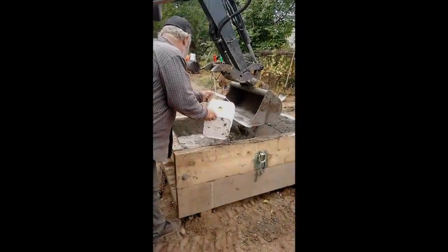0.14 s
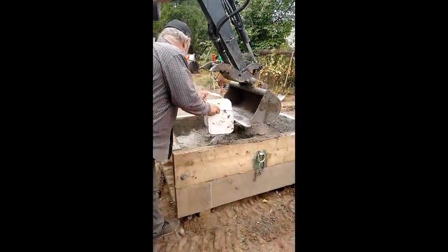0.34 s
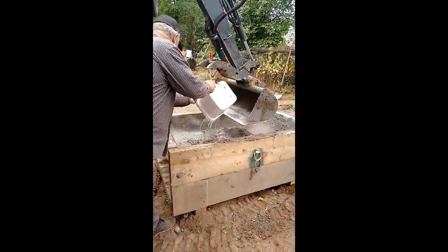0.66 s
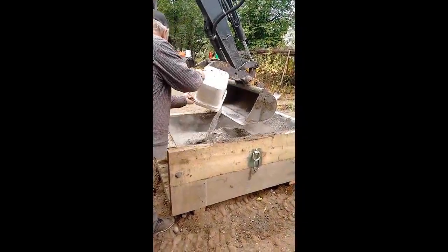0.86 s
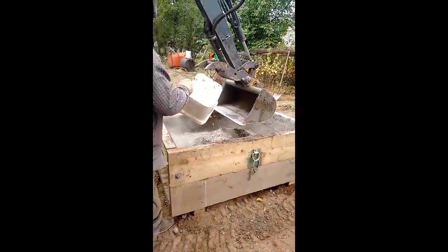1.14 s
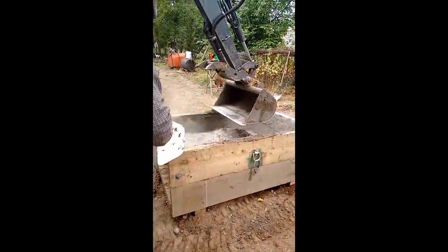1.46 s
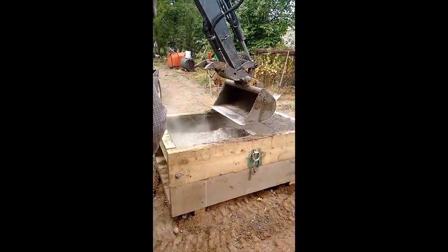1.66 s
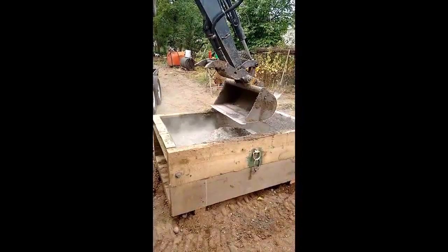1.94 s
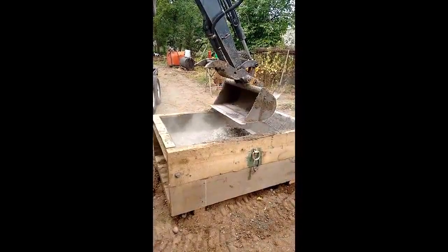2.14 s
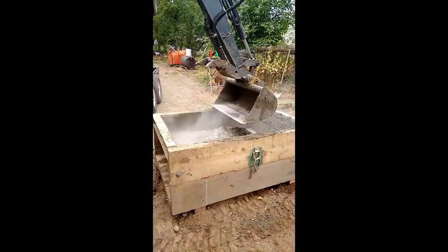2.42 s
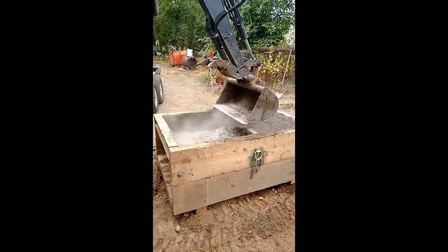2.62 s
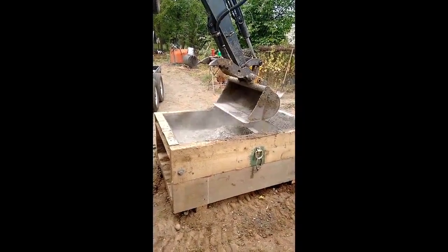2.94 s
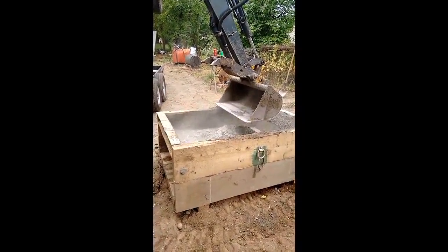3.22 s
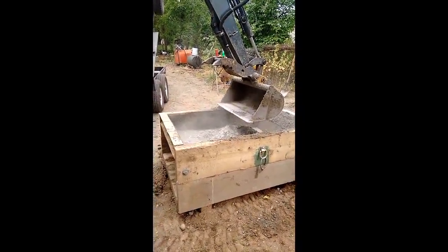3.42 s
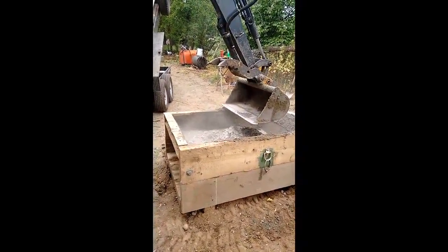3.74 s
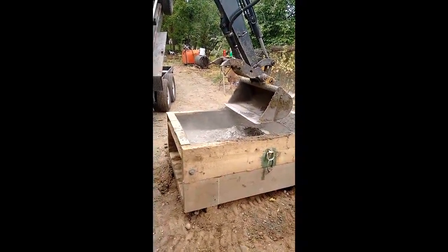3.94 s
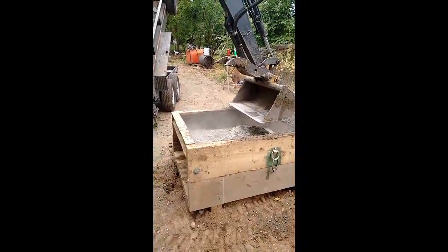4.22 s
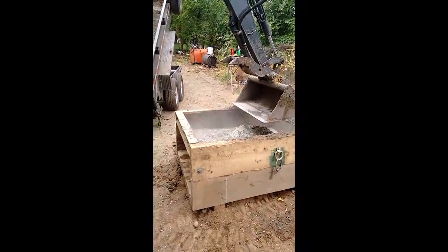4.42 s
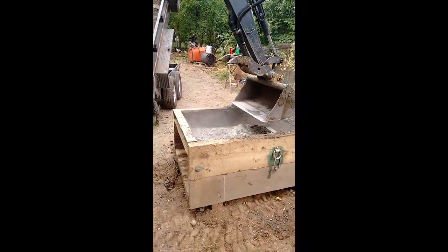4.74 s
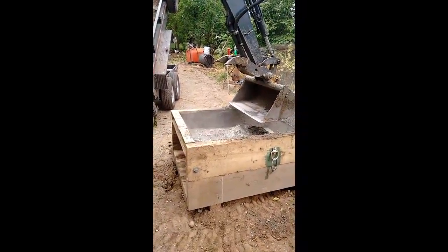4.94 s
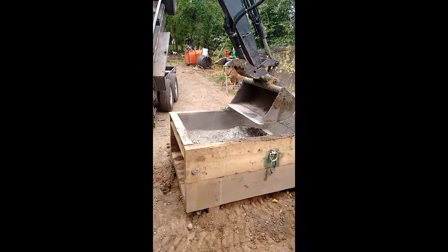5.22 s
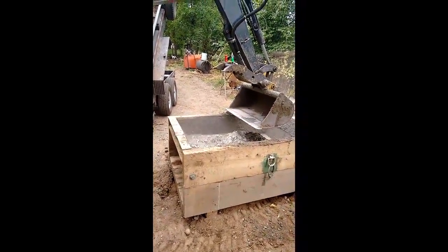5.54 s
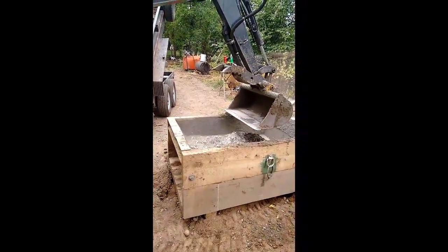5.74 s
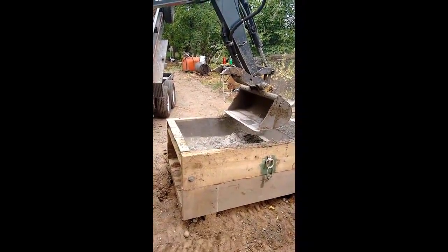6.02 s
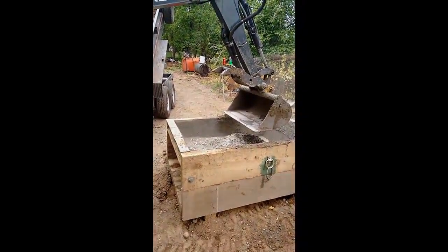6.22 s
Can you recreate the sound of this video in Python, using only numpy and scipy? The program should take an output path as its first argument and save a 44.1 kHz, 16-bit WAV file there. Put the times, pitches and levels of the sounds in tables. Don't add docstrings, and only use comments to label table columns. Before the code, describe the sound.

Steady diesel clatter in a yard, a short pour of water with slaps and bubbles, gritty footsteps, then a loud plastic tub landing on stones.

```python
import sys
import numpy as np
from scipy import signal
from scipy.fft import rfft, irfft, next_fast_len
from scipy.io import wavfile
from scipy.ndimage import uniform_filter1d, map_coordinates

SR = 44100
rng = np.random.default_rng(int(sys.argv[2]) if len(sys.argv) > 2 else 0)


def store_wav(level_fs):
    pcm = np.round(np.clip(np.atleast_2d(level_fs), -1, 1) * 32767)
    wavfile.write(sys.argv[1], SR, pcm.T.astype(np.int16))


def voltage_ratio(level):
    return 10 ** (np.asarray(level, float) / 20)


N = 280917

# order (multiple of cycle rate), level_db (rms)
SHAFT_ORDERS = [(3, -36), (6, -44.5), (9, -54.5), (10, -50), (11, -53), (12, -39.5), (15, -38.5), (16, -56),
                (18, -44), (19, -57), (20, -43.5), (21, -48), (23, -46), (24, -41), (25, -43), (26, -45),
                (27, -40), (28, -37), (29, -48), (30, -49), (32, -43), (33, -46), (34, -44), (36, -44),
                (39, -50), (42, -51), (43, -53), (45, -47), (48, -54), (54, -55), (57, -50.5), (60, -49.5),
                (70, -51), (71, -49), (72, -55), (73, -48)]
# place_cycles (0-1), knock_db, tick_db
INJECTIONS = [
    (.078, 15.5, 7),
    (.385, 11, -4),
    (.728, 15.5, 11),
]
# time_s, lead_cycles
GOVERNOR_LEAD = [(0, -.004), (.7, -.003), (1.3, .004), (1.9, .005), (2.7, 0), (3.4, -.003), (5.4, -.006),
                 (6.2, -.001)]
# time_s, load_db
EXHAUST_LOAD = [(0, 0.5), (.5, 0.5), (1.7, 2), (2.0, -2), (3.0, -3), (3.6, -2), (4.3, -0.5), (6.3, 0)]
# freq_hz, density_db_per_hz
ROAR_SPECTRUM = [(45, -7), (60, -16), (80, -12), (100, -7), (120, 1.5), (135, -6.5), (170, -6.5),
                 (215, -10), (255, -5.5), (290, -1.5), (340, -3), (400, -4), (470, -8.5), (540, -18),
                 (620, -19), (800, -20.5)]
# freq_hz, density_db_per_hz
FAN_SPECTRUM = [(350, -0.5), (480, 5.5), (540, -0.5), (620, -5.5), (740, -7), (800, -0.5), (860, -5.5),
                (1300, -11.5), (1900, -19), (2300, -14.5), (3500, -25), (4700, -28), (5800, -29.5),
                (7200, -34.5), (9000, -30.5), (13000, -40.5), (16000, -49)]
# freq_hz, density_db_per_hz
KNOCK_SPECTRUM = [(900, -3), (1800, 7.5), (2500, 14), (3100, 8.5), (3700, 1.5), (4300, -15), (5500, -44)]
# freq_hz, density_db_per_hz
TICK_SPECTRUM = [(4000, -26), (5300, 0), (6200, -2), (7500, -20)]
# freq_hz, density_db_per_hz
CASING_SPECTRUM = [(450, -18), (600, -5), (800, -4), (1100, -6.5), (1500, -10.5), (2000, -20)]
# time_s, flow_db
STREAM_FLOW = [(0.0, -48.5), (0.14, -44.5), (0.24, -34.5), (0.4, -37), (0.5, -36.5), (0.62, -34),
               (0.9, -40), (1.05, -38), (1.2, -38), (1.34, -42.5)]
# freq_hz, density_db_per_hz
SPLASH_SPECTRUM = [(1000, 13.5), (2500, 7.5), (4000, 2.5), (6000, 3), (7500, -1), (9000, 1.5),
                   (11500, -4.5), (13500, -10), (16000, -20)]
# start_s, peak_db, pitch_hz
SLAPS = [(0.254, -15, 840), (0.386, -13.5, 770), (0.786, -20, 830), (1.14, -18, 740), (2.56, -24, 1030),
         (2.598, -26, 856), (2.651, -21, 665), (2.9435, -15.5, 680), (2.999, -20.5, 700), (1.5, -19, 600),
         (0.413, -21, 1080), (1.034, -24, 611), (1.159, -31, 634), (1.338, -25, 786), (2.612, -25, 330),
         (0.621, -34, 517), (4.79, -22, 1140), (4.976, -21, 1500), (5.368, -19, 1010), (4.588, -19, 330),
         (4.605, -31, 400), (5.682, -20, 1090)]
# start_s, crack_db, body_db, crack_t60_s
TUB_CONTACTS = [(4.305, -10.5, -6.5, 0.042), (4.3313, -20.5, -28, 0.067), (4.346, -32, -32, 0.033),
                (4.369, -25.5, -29, 0.05), (4.504, -37, -63, 0.056), (4.523, -41, -50, 0.06),
                (4.53, -26, -42, 0.032), (4.5383, -30, -52, 0.043), (4.6024, -27.5, -35, 0.05),
                (4.619, -25.5, -40, 0.022), (4.643, -39.5, -44, 0.11)]
# freq_hz, level_db, t60_s
SHELL_MODES = [(159, -14.5, 0.22), (318.4, -8, 0.14), (400, -21, 0.12), (542, 1, 0.17), (600, 3, 0.085),
               (720, -1, 0.051), (844, 8, 0.039), (1040, -22, 0.018), (1350, -2, 0.04), (1730, -10, 0.03)]
# peak_s, level_db, dies_s, grit_db, boom_db
TUB_SKIDS = [
    (4.312, -24, 0.2, -5, 3.5),
    (4.536, -33.5, 0.13, -4, -14),
    (4.622, -35, 0.2, -6, -6),
    (4.633, -42, 0.26, -3, 9),
]
# freq_hz, density_db_per_hz
RIM_SPECTRUM = [(700, -8), (1000, -1), (1140, 1.5), (1280, -10), (1400, -5), (1600, -11), (2100, -25)]
# peak_s, level_db, dies_s, grit_db, boom_db
BOOT_STROKES = [
    (2.605, -28, 0.056, -8, 3.5),
    (2.652, -27, 0.11, -30, 0),
    (2.985, -35.5, 0.22, -14, 2),
    (4.045, -35.5, 0.13, -3, -14),
]
# start_s, peak_db, dull_db
GRIT_SNAPS = [(0.021, -35.5, -34), (0.1547, -30, -47), (0.1916, -40, -48), (0.235, -31, -32),
              (0.256, -34, -27.5), (0.3952, -26, -34), (0.413, -29, -36), (0.5593, -25, -41),
              (0.919, -45, -36), (1.0646, -38, -49), (1.1205, -29.5, -35), (0.8585, -30, -35),
              (0.983, -28, -35), (1.027, -26, -47), (1.036, -41, -46), (1.277, -33, -32),
              (2.3105, -35, -57), (2.318, -39, -58), (2.3557, -38, -56), (2.399, -35, -51),
              (2.436, -34, -38), (2.4744, -42, -46), (2.5626, -37, -52), (2.6055, -41, -56),
              (3.0494, -40, -55), (3.3294, -37, -51), (3.3594, -43, -57), (3.245, -40, -56),
              (4.744, -50, -48.5), (4.766, -46, -42), (4.822, -41, -54), (4.906, -41.5, -51),
              (4.978, -58, -45), (5.1183, -47, -55), (5.3094, -44, -55), (4.058, -39, -42)]
# start_s, peak_db
GRIT_TINKS = [
    (2.3984, -45),
    (2.4744, -46),
    (4.7664, -52),
    (4.821, -41),
    (4.906, -54),
]
# start_s, level_db, t60_s
WIND_PUFFS = [
    (1.7, -34, .25),
    (5.45, -36, .2),
    (5.86, -26, .2),
]
# freq_hz, left_lead_rad
PORT_LEAD = [(1100, 0), (2350, -np.pi), (14700, -11 * np.pi)]
# freq_hz, left_minus_right_db
PORT_TILT = [(40, 1), (130, -1.5), (500, -4), (700, -1.5), (1300, 0.5), (2200, -4.5), (3500, -1),
             (5500, -6), (8500, -2.5), (9600, -3.5), (11500, -13.5), (15000, -25.5)]
# freq_hz, likeness (0-1)
PORT_LIKENESS = [(40, .85), (70, .35), (130, .72), (400, .88), (650, .68), (1200, .98), (2300, .88),
                 (6000, .75), (8500, .15), (15000, .05)]
# from_hz, to_hz, rarity, rarity_change_per_s
CENTRE_HOLES = [(2150, 2450, 2.6, -.2), (4400, 4750, .3, .25), (4750, 5100, -.2, .33),
                (7050, 7450, 1.5, -.05)]
# from_hz, to_hz, rarity
SIDE_HOLES_BANDS = [(3450, 3800, .7), (5850, 6150, 1.3), (7200, 7500, 1.9), (8300, 8700, 1.1)]

CYCLE_HZ = 11.137
CHUG_FIRST_ORDER, CHUG_LAST_ORDER = 23, 36
STREAM_STOPS_S, DROP_S = 1.35, 4.306


def unit(x):
    return x / np.sqrt(np.mean(x ** 2) + 1e-20)


def along(points, hz):
    f, v = np.transpose(points)
    return np.interp(np.log(hz + 1), np.log(f + 1), v)


def closed(spectrum):
    return [(spectrum[0][0] / 2, -90), *spectrum, (spectrum[-1][0] * 2, -90)]


def curve(rows):
    s, v = np.transpose(rows)
    return np.interp(np.arange(N) / SR, s, v)


def wobble(knots_per_s):
    knots = rng.standard_normal(int(N * knots_per_s / SR) + 4)
    return map_coordinates(knots, [np.arange(N) * knots_per_s / SR])


def filtered(x, response):
    m = next_fast_len(N + 8192)
    return irfft(rfft(x, m) * response(np.fft.rfftfreq(m, 1 / SR)), m)[..., :N]


def noise(spectrum, grain_db=0, rate=300):
    shape = closed(spectrum)
    grain = voltage_ratio(grain_db * wobble(rate))
    return unit(filtered(grain * rng.standard_normal((3, N)), lambda hz: voltage_ratio(along(shape, hz))))


def bursts(rows, rise_s):
    out, t = np.zeros(N + SR), np.arange(SR // 4) / SR
    for start_s, db, t60_s in rows:
        out[round(start_s * SR):][:len(t)] += voltage_ratio(db - 60 * t / t60_s) * np.clip(t / rise_s, 0, 1)
    return out[:N]


def engine():
    t, tone = np.arange(N) / SR, np.zeros(N)
    cycle = CYCLE_HZ * t + .853 + curve(GOVERNOR_LEAD)
    load_db = curve(EXHAUST_LOAD)
    pump_order, pump_beat = 15, .3 * np.cos(2 * np.pi * 2.27 * (t - .3))
    low_place, high_place, whine_order = .105, .02, 65

    for k, db in SHAFT_ORDERS:
        unsteady = np.clip(1 + (k / 36) ** 3, 0, 8)
        phase = 2 * np.pi * (k * (cycle - .23) - .044 * (k - 26.4) ** 2) + .1 * rng.standard_normal()
        low_firing = k % 3 == 0 and 10 < k < CHUG_FIRST_ORDER
        if low_firing or k > whine_order:
            place = low_place if k < CHUG_FIRST_ORDER else high_place
            phase = 2 * np.pi * k * (cycle - place) + np.pi / 2
        phase += 0.06 * unsteady * wobble(4.6)
        chug_db = load_db * (CHUG_FIRST_ORDER <= k <= CHUG_LAST_ORDER)
        level = voltage_ratio(db + 3.5 + chug_db + 0.41 * unsteady * wobble(7))
        tone += level * np.cos(phase) * (1 + (k == pump_order) * pump_beat)

    throb_db = 1.8 * np.cos(2 * np.pi * (cycle - .2))
    fan_db = .2 * wobble(2.6) + .8 * wobble(37)
    roar = voltage_ratio(-33.0 + throb_db + 0.11 * wobble(4.1)) * noise(ROAR_SPECTRUM)
    fan = voltage_ratio(-33.0 + 0.014 * throb_db + fan_db) * noise(FAN_SPECTRUM)

    knock, tick = np.zeros(N), np.zeros(N)
    for place, knock_db, tick_db in INJECTIONS:
        since = (cycle - place) % 1
        size_db = rng.normal(0, 1., 100)[(cycle - place + 1).astype(int)]
        knock += voltage_ratio(knock_db + size_db - 60 * since / .42) * np.clip(since / .025, 0, 1)
        tick += voltage_ratio(tick_db + size_db - 60 * since / .4) * np.clip(since / .02, 0, 1)
    clatter = voltage_ratio(-48.5) * knock * noise(KNOCK_SPECTRUM, grain_db=3.7, rate=200)
    clatter = clatter + voltage_ratio(-55.5) * tick * noise(TICK_SPECTRUM)

    pitched = (tone + casing(cycle)) * np.array([[1], [0], [.6]])
    return pitched + roar + fan + voltage_ratio(load_db) * clatter


def casing(cycle):
    orders = np.arange(513)
    level_draw, phase_draw = rng.standard_normal((2, len(orders)))
    level = voltage_ratio(along(closed(CASING_SPECTRUM), orders * CYCLE_HZ)) * voltage_ratio(2 * level_draw)
    once = unit(irfft(level * np.exp(9j * phase_draw), 4096))
    return voltage_ratio(-43 + 1.5 * wobble(9)) * np.interp(cycle % 1, np.arange(4096) / 4096, once, period=1)


def water():
    t = np.arange(N) / SR
    fizz_hold_s, fizz_dies_db_per_s = 0.64, 26.5
    fizz_fade_s = np.clip(t - STREAM_STOPS_S - fizz_hold_s, 0, None)
    fizz = voltage_ratio(-47 - fizz_dies_db_per_s * fizz_fade_s) * (t > STREAM_STOPS_S)
    dregs = voltage_ratio(-43.5 - 19 * (DROP_S - t)) * (t < DROP_S)
    stream = voltage_ratio(curve(STREAM_FLOW) - 240 * np.clip(t - STREAM_STOPS_S, 0, None))
    flow = stream + fizz + dregs
    spill = voltage_ratio(-43.5 - 3 * (t - DROP_S)) * (t > DROP_S)

    splash = (flow + spill) * voltage_ratio(2.0 + 1.13 * wobble(21.77))
    splash = splash * noise(SPLASH_SPECTRUM, grain_db=1.5, rate=700)
    churn = flow * (flow / voltage_ratio(-34.5)) ** (0.92 - 1) * voltage_ratio(1.2 * wobble(12))
    gurgle_spectrum = [(600, 5.0), (900, 3.0), (1500, -16.5), (2000, 4.0), (2600, -5.0)]
    gurgle = churn * noise(gurgle_spectrum, grain_db=3.0, rate=120)
    return splash, gurgle + slaps() + bubbles(churn)


def slaps():
    out, t = np.zeros(N + SR), np.arange(SR // 8) / SR
    t60_s, rise_s = 0.011, .0004
    for start_s, db, hz in SLAPS:
        ring = np.sin(2 * np.pi * hz * t)
        ring += 0.38 * np.sin(2 * np.pi * 1.54 * hz * t)
        ring += .5 * np.sin(2 * np.pi * 0.675 * hz * t)
        out[round(start_s * SR):][:len(t)] += voltage_ratio(db + 3 - 60 * t / t60_s) * ring * (1 - np.exp(-t / rise_s))
    return out[:N] * np.array([[1], [.5], [.3]])


def bubbles(flow):
    count, centre_hz, life_cycles, rise_share = 260, 1920, 8.1, 0.2
    draw, t = rng.random((count, 3)), np.arange(SR // 40) / SR
    start = (draw[:, :1] * STREAM_STOPS_S * SR).astype(int)
    hz = centre_hz * 2.4 ** (draw[:, 1:2] - .7)
    life = hz * t / life_cycles
    ring = np.sin(2 * np.pi * hz * t * (1 + rise_share * life / 2))
    ring = ring * np.exp(-3 * life) * np.clip(8 * life, 0, 1)
    size = voltage_ratio(1 - 3 * np.log(draw[:, 2:] + .05))
    plinks = np.bincount((start + np.arange(len(t))).ravel(), (size * ring).ravel(), N)
    return flow * plinks * np.array([[1], [.6], [.4]])


def tub():
    shell, t = np.zeros(N + SR), np.arange(SR // 2) / SR
    u = (t - .0012) / .00027
    push = 4.6 * (1 - u * u + 0.5 * u) * np.exp(-u * u / 2)
    for start_s, _, body_db, _ in TUB_CONTACTS:
        ring = np.zeros(len(t))
        for hz, db, t60_s in SHELL_MODES:
            ring += voltage_ratio(db + rng.normal(0, 1.0) - 60 * t / t60_s) * np.sin(2 * np.pi * hz * t)
        hit = push + ring * (1 - np.exp(-t / 0.0023))
        shell[round(start_s * SR):][:len(t)] += voltage_ratio(body_db - 3.0) * hit
    crack = bursts([(s, db, t60_s) for s, db, _, t60_s in TUB_CONTACTS], rise_s=0.00051)
    crack_spectrum = [(1800, 2), (2700, 1.5), (3600, 0.5), (4600, 2.5), (6000, -2.5),
                      (9000, -12.5), (13000, -10), (16000, -30.0)]
    cracks = voltage_ratio(-4.0) * crack * noise(crack_spectrum)
    echo = np.pad(shell, (130, 0))[:N]
    return np.array([shell[:N], 0.089 * echo, 0.56 * echo]) + cracks


def ground():
    drag, boot_grit, boot_boom = strokes(BOOT_STROKES, rises_db_per_s=453, bend=1.7)
    skid, skid_grit, skid_boom = strokes(TUB_SKIDS, rises_db_per_s=2500, bend=1.24)
    snap_t60_s = 0.017
    snap = bursts([(s, db, snap_t60_s) for s, db, _ in GRIT_SNAPS], rise_s=0.0023)
    dull = bursts([(s, db, snap_t60_s) for s, _, db in GRIT_SNAPS], rise_s=0.0047)
    tink = bursts([(s, db, .012) for s, db in GRIT_TINKS], rise_s=0.0011)
    drag_spectrum = [(500, -5), (800, 4.0), (1200, -3.5), (1600, -18.5), (2100, -20.0)]
    grit_spectrum = [(2000, 13.5), (3000, 9.5), (6000, -3.0), (12000, -11.0), (16000, -33)]

    out = voltage_ratio(0.5) * snap * noise([(4000, -3), (5500, 7.5), (12000, -1), (16000, -19)])
    out += voltage_ratio(13.0) * dull * noise([(1500, -4), (2200, -2), (4000, -5), (5000, -7)])
    out += tink * noise([(9000, -8), (12000, 5), (16000, -3)])
    out += drag * noise(drag_spectrum, grain_db=5.0, rate=190)
    out += voltage_ratio(-2.5) * skid * noise(RIM_SPECTRUM)
    out += (boot_grit + skid_grit) * noise(grit_spectrum, grain_db=2.5, rate=500)
    out += voltage_ratio(1.0) * (boot_boom + skid_boom) * noise([(240, -14.5), (315, 0.5), (400, -6.0)])
    return out


def strokes(rows, rises_db_per_s, bend):
    t, out = np.arange(N) / SR, np.zeros((3, N))
    for peak_s, db, dies_s, grit_db, boom_db in rows:
        early_s = np.clip(peak_s - t, 0, None)
        late = np.clip(t - peak_s, 0, None) / dies_s
        out += voltage_ratio(db - rises_db_per_s * early_s - 60 * late ** bend) * voltage_ratio([[0], [grit_db], [boom_db]])
    return out


def wind():
    breeze = voltage_ratio(-39.5 + 3 * wobble(9)) * noise([(18, 0), (50, -1), (80, -4), (110, -12)])[0]
    puffs = bursts(WIND_PUFFS, rise_s=0.044) * noise([(35, 2), (55, 0), (75, -6)])[0]
    return np.array([0.85 * breeze + puffs, -1.1 * breeze + .4 * puffs])


def ports(waves, behind):
    m = next_fast_len(N + 8192)
    hz = np.fft.rfftfreq(m, 1 / SR)
    front, back, around = rfft(waves, m)
    alike = np.clip(along(PORT_LIKENESS, hz), 0, 1)
    lag = np.exp(.5j * np.interp(hz, *np.transpose(PORT_LEAD)))
    tilt = voltage_ratio(along(PORT_TILT, hz) / 2)
    front = front * np.sqrt(alike * (1 - behind))
    back = back * np.sqrt(alike * behind)
    around = around * np.sqrt(1 - alike)
    left = (front * lag + back / lag + 1j * around) * tilt
    right = (front / lag + back * lag + around) / tilt
    return irfft([left, right], m)[:, :N]


def gain():
    t = np.arange(N) / SR
    dive_db, dive_tau_s, snap_share, snap_tau_s = -16.5, 0.12, .45, .008
    return_s, return_db_per_s, knee_db = 4.675, 7, 0.83
    since = np.clip(t - DROP_S, 0, None)
    slow = (1 - snap_share) * np.exp(-since / dive_tau_s)
    fast = snap_share * np.exp(-since / snap_tau_s)
    dive = dive_db * (1 - slow - fast)
    climb = return_db_per_s * 0.12 * np.logaddexp(0, (t - return_s) / 0.081)
    duck_db = -knee_db * np.logaddexp(0, -(dive + climb) / knee_db)
    return voltage_ratio(0.5 - 2.5 * np.exp(-t / 0.12) + duck_db)


def scene():
    splash, gurgle = water()
    close = (ground() + tub()) / gain()
    near = voltage_ratio([[-.8], [.8]]) * ports(close, behind=0.47)
    return ports(engine() + gurgle, behind=0.29) + near + ports(splash, behind=0.65) + wind()


def dropout(knots_per_s, rarity):
    return uniform_filter1d(1. * (wobble(knots_per_s) > rarity), size=500)


def low_pass(x):
    return signal.sosfilt(signal.butter(12, 16440, fs=SR, output="sos"), x)


def record(dry):
    x = filtered(dry * gain(), lambda hz: hz < 15760)
    for lo_hz, hi_hz, rarity, change_per_s in CENTRE_HOLES:
        off = dropout(24, rarity + change_per_s * np.arange(N) / SR)
        x = x - off * filtered(x.mean(0), lambda hz: (hz > lo_hz) & (hz < hi_hz))
    for lo_hz, hi_hz, rarity in SIDE_HOLES_BANDS:
        side = filtered((x[0] - x[1]) / 2, lambda hz: (hz > lo_hz) & (hz < hi_hz))
        x = x - dropout(24, rarity) * side * [[1], [-1]]
    x = x - dropout(30, .1) * filtered(x, lambda hz: hz > 15450)
    mix = x / (1 + np.abs(x) ** 8) ** (1 / 8)
    return low_pass(mix)


dry = scene()
out = record(dry)
store_wav(out)
```